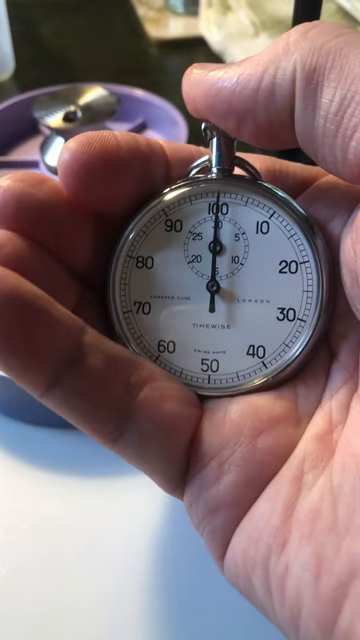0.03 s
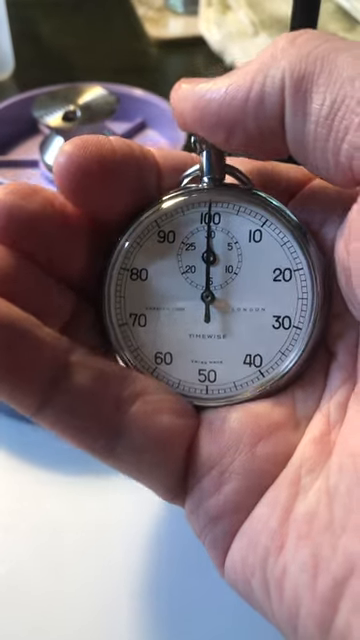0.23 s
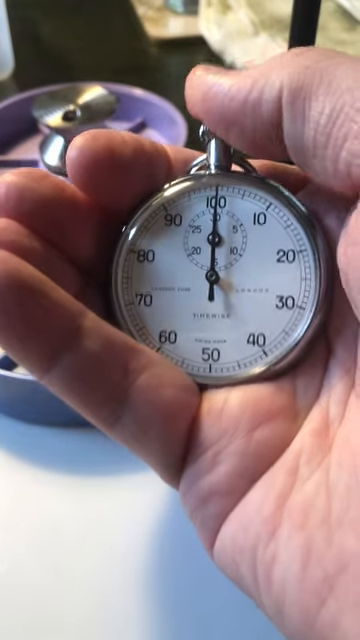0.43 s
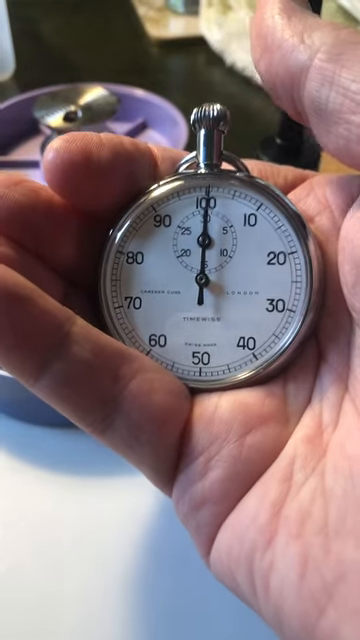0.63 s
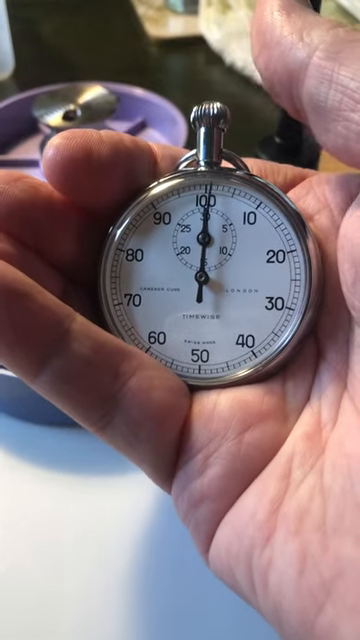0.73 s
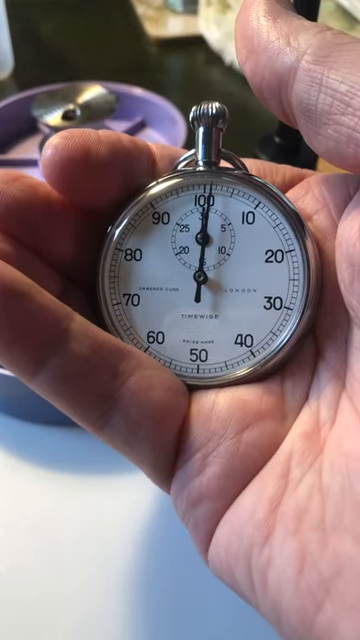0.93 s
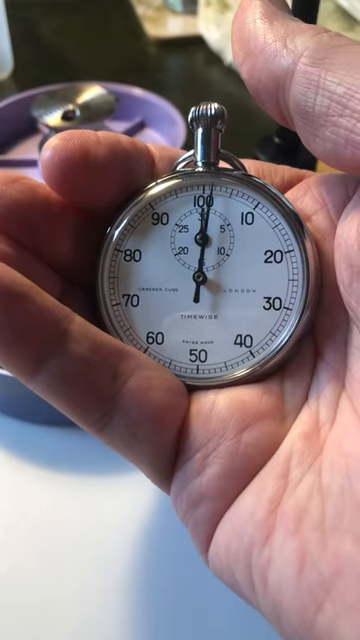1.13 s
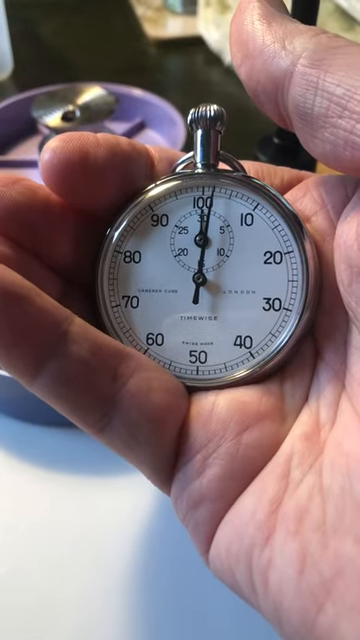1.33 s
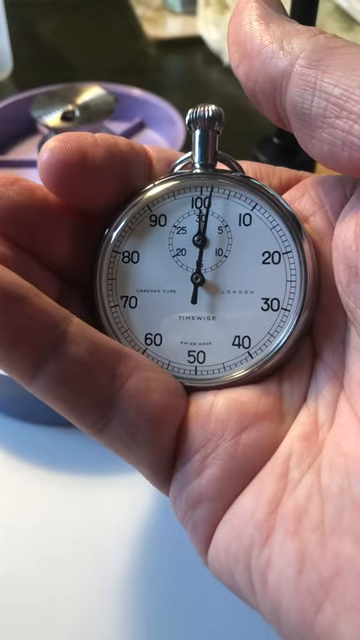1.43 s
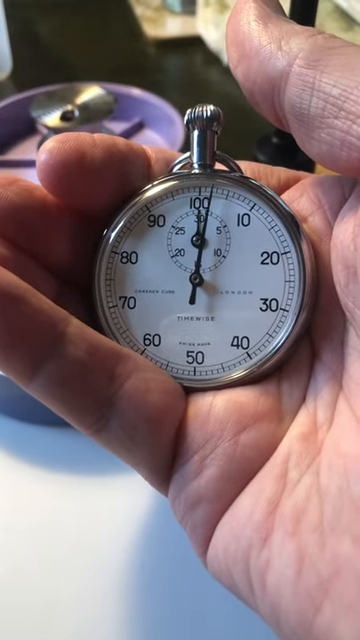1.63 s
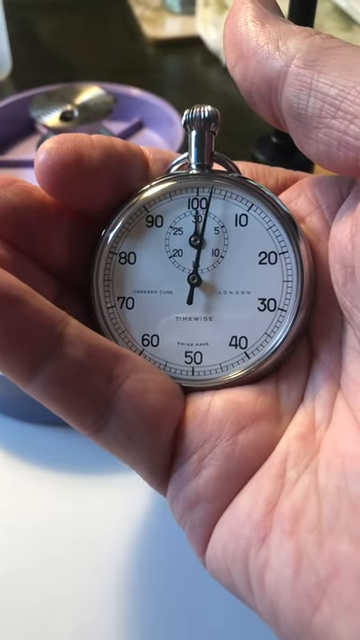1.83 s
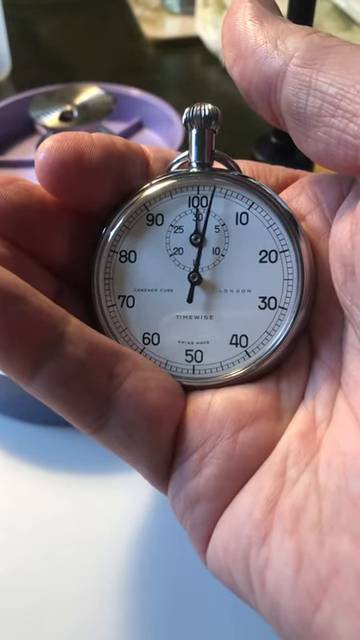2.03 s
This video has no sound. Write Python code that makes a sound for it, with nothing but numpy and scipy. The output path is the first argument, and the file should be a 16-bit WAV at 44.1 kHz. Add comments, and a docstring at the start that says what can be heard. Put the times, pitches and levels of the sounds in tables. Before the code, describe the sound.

A mechanical stopwatch held close to the microphone: a light click, a loud metallic snap, another crisp snap as the button springs back, then faint ticking five times a second in a small quiet room.

```python
"""Two sharp metallic snaps, then a tick five times a second, over a low rumble in a small, quiet room.
A hand-held mechanical stopwatch is started close to the microphone: the crown takes up its slack,
snaps down and springs back, and each blow excites the resonances of the steel case and the room.
The escapement ticks by runs of short noise bursts through its own resonances; fingers tap and rub
the case as bursts of band noise; the room is shaped noise, excited modes and a wavering low hum."""
import sys
import numpy as np
from scipy import signal
from scipy.fft import rfft, irfft
from scipy.io import wavfile

SR = 44100
rng = np.random.default_rng(int(sys.argv[2]) if len(sys.argv) > 2 else 0)


def to_wav(sig):
    """Store sig (one row per channel, or 1-D mono) as 16-bit WAV at the path in sys.argv[1].

    Samples outside -1..1 are clipped; the rate is SR.
    """
    pcm = np.clip(np.atleast_2d(sig), -1, 1) * 32767
    pcm = np.round(pcm).astype(np.int16)
    wavfile.write(sys.argv[1], SR, pcm.T)  # frames by channels


N = 92610
T = np.arange(N) / SR  # time, s
HZ = np.maximum(np.fft.rfftfreq(N, 1 / SR), 1)  # frequency of each spectral bin
DIRECT, TO_ROOM = 2, -1  # level columns of a table of resonances


def undb(db):
    """Level law: decibels to an amplitude ratio."""
    return 10 ** (np.asarray(db) / 20)


def fade(t60):
    """Exponential damping: the amplitude falls by 60 dB in t60 seconds."""
    return np.exp(-np.log(1000) * T / max(t60, 1e-4))


def delay(x, s):
    """Time shift: the sound starts s seconds later."""
    silence = np.zeros(max(int(round(s * SR)), 0))
    return np.concatenate([silence, x])[:N]


def hump(hz, half_width):
    """Resonance curve: unit gain at the centre, with steep sides."""
    return (1 + ((HZ - hz) / half_width) ** 2 / 2) ** -1.5


def response(modes, column):
    """Modal superposition: the powers of all resonances add, at the levels in one column."""
    powers = [(hump(mode[0], mode[1]) * undb(mode[column])) ** 2 for mode in modes]
    return np.sqrt(sum(powers))


def struck(gain):
    """Minimum phase: folding the cepstrum gives the causal impulse response with this gain."""
    cepstrum = irfft(np.log(gain + 1e-5), N)
    cepstrum[1:N // 2] *= 2
    cepstrum[N // 2 + 1:] = 0
    return irfft(np.exp(rfft(cepstrum)), N)


def noise(gain):
    """Linear filtering: white noise takes on this gain."""
    return irfft(rfft(rng.standard_normal(N)) * gain, N)


def unit(x):
    """Normalisation to a standard deviation of 1."""
    return x / np.std(x)


def coloured(points):
    """Spectral shaping: unit noise with levels interpolated over log frequency."""
    hz, db = np.array(points).T
    return unit(noise(undb(np.interp(np.log(HZ), np.log(hz), db))))


def level_curve(rows):
    """Slow amplitude modulation: levels in dB interpolated over time, as a gain."""
    return undb(np.interp(T, *np.array(rows).T))


def burst(t60):
    """Random excitation: exponentially dying chatter of unit energy."""
    x = rng.standard_normal(N) * fade(t60)
    return x / np.linalg.norm(x)


def room(gain):
    """Reverberation as decaying noise: weak early scatter, then the walls; the treble dies first."""
    wall_delay_s, early_db = .0118, -2
    t60_s, damping = 0.37, .27  # t60 at 3 kHz, falling as this power of frequency
    arrival = np.where(T < wall_delay_s, undb(early_db), 1)
    octaves = np.log2(np.clip(HZ / 3000, 1 / 2, 4))
    out = 0
    for k in range(-1, 3):
        env = fade(t60_s * 2 ** (-k * damping)) * arrival
        band = np.sqrt(np.maximum(1 - abs(octaves - k), 0))  # the band powers sum to one
        out = out + noise(gain * band) * env / np.linalg.norm(env)
    return out


def blows(rows, modes, rattle_db, rattle_t60, room_db, snap_db):
    """Impact excitation: a sharp snap and a brief rattle of the works ring the resonances and room."""
    crowd_hz, crowd_width_hz = 7000, 3500  # crowd of weak case modes
    crowd_db = -13  # against the strongest resonance in the room
    direct = response(modes, DIRECT)
    sent = response(modes, TO_ROOM)
    sent = np.hypot(sent, sent.max() * undb(crowd_db) * hump(crowd_hz, crowd_width_hz))
    out = 0
    for s, db, tilt in rows:
        # the tilt pivots at 7 kHz and is level below 1 kHz
        colour = undb(db + tilt * np.log2(np.maximum(HZ, 1000) / 7000))
        ring = struck(direct * colour)
        rattle = signal.fftconvolve(ring, burst(rattle_t60))[:N]
        echo = room(sent * colour)
        blow = undb(snap_db) * ring + undb(rattle_db) * rattle + undb(room_db) * echo
        out = out + delay(blow, s)
    return out


def background(waver_db=3.5, waver_hz=4):
    """Stationary noise and excited room modes, with a swelling distant rumble and a modulated hum."""
    # spectrum of the steady room noise: frequency_hz, relative_level_db
    floor_spectrum = [(20, -41.5), (35, -22), (50, -14.5), (75, -13.5), (120, -7), (180, -4.5), (260, -9),
                      (450, -14.5), (900, -19.5), (1800, -29.5), (3500, -34), (10000, -36), (13000, -41),
                      (16000, -45.5)]
    # spectrum of the distant rumble: frequency_hz, relative_level_db
    swell_spectrum = [(60, -31), (150, -5.5), (250, 2), (450, -1.5), (700, -9.5), (1200, -15), (2000, -30),
                      (4000, -48)]
    # rise and fall of the distant rumble: time_s, level_db
    swell_levels = [(0, -77.5), (.85, -72), (1.15, -73.5), (1.45, -60.5), (1.7, -71.5), (2.1, -88)]
    # low room resonances: centre_hz, half_width_hz, relative_level_db
    room_modes = [(171, 7.7, 0), (205.6, 26, -3), (303, 9.9, -9), (380, 18, -12.5)]
    # excitation of those resonances: time_s, level_db
    boom_levels = [(0, -63.5), (.8, -67), (1.2, -59.5), (1.6, -59), (2.1, -68)]
    # course of the low hum: time_s, level_db
    hum_levels = [(0, -74), (.4, -68.5), (.92, -66), (1.02, -73), (1.5, -70.5), (2.1, -80)]
    floor_db, hum_hz = -65.5, 49.4

    steady = coloured(floor_spectrum) * undb(floor_db)
    boom = unit(noise(response(room_modes, 2))) * level_curve(boom_levels)
    rumble = coloured(swell_spectrum) * level_curve(swell_levels)
    waver = undb(waver_db * unit(noise(hump(0, waver_hz))))
    hum = unit(np.sin(2 * np.pi * hum_hz * T) * waver) * level_curve(hum_levels)
    return steady + boom + rumble + hum


def crown_slack():
    """Light impact: the crown takes up its slack and rings the stem in its sleeve."""
    # blow: start_s, level_db, brightness_db_per_octave
    slack = [(.0407, 0.5, -2)]
    # stem resonances: centre_hz, half_width_hz, direct_db, to_room_db
    stem_modes = [(1803, 300, -24, -39.5), (2850, 490, -15.5, -32.5), (4750, 800, -20.5, -35),
                  (7150, 195, -14.5, -38), (8150, 670, -23.5, -36.5), (11050, 570, -13, -38),
                  (13450, 400, -14, -45), (14850, 580, -8.5, -40)]
    return blows(slack, stem_modes, rattle_db=-5.5, rattle_t60=0.0088, room_db=-1, snap_db=0.5)


def crown_press():
    """Impact and free vibration: the crown snaps down; weakly damped tones of case and spring ring on."""
    # blows: start_s, level_db, brightness_db_per_octave
    presses = [(0.2182, -40, 0), (.2300, -44.5, 1.6), (0.2412, 1, 0.22)]
    # case resonances, crown down: centre_hz, half_width_hz, direct_db, to_room_db
    press_modes = [(1072, 380, -4.5, -21.5), (1504, 150, 0, -20), (2714, 150, 13.5, -2.5),
                   (3200, 270, 16, -6), (3900, 370, 3, -14), (4890, 130, -9.5, -4.5),
                   (5620, 310, 10.5, -4.5), (6300, 500, 9.5, -7.5), (7160, 320, 12.5, -11.5),
                   (7950, 380, 13.5, -8.5), (9070, 320, 11, -22), (11400, 600, 2, -18.5),
                   (13450, 600, -1.5, -30), (15580, 450, -0.5, -28.5)]
    # long rings of case and spring: frequency_hz, level_db, t60_s
    rings = [(2685, -41, .2), (2756, -48, .24), (3088, -53, .3), (5632, -56, .35), (6041, -58, .4)]
    snap = blows(presses, press_modes, rattle_db=-7, rattle_t60=.012, room_db=2, snap_db=0)
    ring = sum(undb(db) * np.sin(2 * np.pi * hz * T) * fade(t60) for hz, db, t60 in rings)
    return snap + delay(ring, presses[-1][0])


def crown_release():
    """Impact and friction: the crown springs back, its stem scraping as noise through the case."""
    # blows: start_s, level_db, brightness_db_per_octave
    releases = [(.4738, -46.5, 3), (.4948, -12.5, -2.5), (.4962, 2.5, 0.5)]
    # case resonances, crown springing back: centre_hz, half_width_hz, direct_db, to_room_db
    release_modes = [(1412, 230, -14, -26.5), (2150, 120, -8.5, -26), (2707, 81, 3.5, -20.5),
                     (3360, 150, 14, -13.5), (4346, 300, 5.5, -18.5), (4800, 220, 1, -12),
                     (5300, 120, 5.5, -15.5), (6960, 180, 12, -23), (8385, 550, 14, -19.5),
                     (9500, 475, 10, -25), (10530, 280, 3.5, -24.5), (11470, 410, 6.5, -23),
                     (13630, 897, -12, -36), (15700, 260, -14, -47)]
    scrape_s, scrape_length_s = .485, .011
    scrape_db = -45.5  # reached at the end of its rise
    snap = blows(releases, release_modes, rattle_db=-12, rattle_t60=0.0079, room_db=2.5, snap_db=-0.5)
    rise = np.sqrt(T / scrape_length_s) * (T < scrape_length_s)
    scrape = unit(noise(response(release_modes, DIRECT))) * rise * undb(scrape_db)
    return snap + delay(scrape, scrape_s)


def hand(tap_t60=0.015):
    """Contact and friction: tiny taps, soft grainy rubs and one dull damped bump as the grip shifts."""
    # soft rubs of skin: start_s, level_db, centre_hz, half_width_hz
    rubs = [(0.159, -68.5, 3150, 1040), (0.454, -63.5, 3170, 1400), (0.603, -67, 2900, 708),
            (.65, -70.5, 1880, 1420), (0.966, -70, 3140, 1117), (1.405, -66, 3155, 849.5),
            (1.777, -69.5, 2860, 1300)]
    # small creaks and taps of the watch: start_s, level_db, centre_hz, half_width_hz
    taps = [(.365, -30.5, 10300, 2000), (.562, -31, 10330, 1780), (.655, -26, 6720, 300),
            (.742, -32, 3200, 1626), (.742, -37.5, 8410, 2984), (.777, -29.5, 2970, 1800),
            (.781, -33.5, 2150, 3450), (.857, -36.5, 4903, 1200), (1.671, -34.5, 2607, 2390),
            (1.912, -39.5, 2970, 2495)]
    rub_attack_s, rub_t60_s = .014, .38
    grain_db, grain_hz = 2.5, 120.2  # rms depth and bandwidth of the roughness
    # the case settles against the palm
    bump_s, bump_hz, bump_t60_s, bump_db = .787, 113, 0.13, -50

    tapping = 0
    for s, db, hz, width in taps:
        tap = signal.fftconvolve(burst(tap_t60), struck(hump(hz, width)))[:N]
        tapping = tapping + delay(tap, s) * undb(db)
    stroke = np.minimum(T / rub_attack_s, 1) * fade(rub_t60_s)
    rubbing = 0
    for s, db, hz, width in rubs:
        rubbing = rubbing + delay(unit(noise(hump(hz, width))) * stroke, s) * undb(db)
    grain = undb(grain_db * unit(noise(hump(0, grain_hz))))
    bump = undb(bump_db) * np.sin(2 * np.pi * bump_hz * T) * fade(bump_t60_s)
    return tapping + rubbing * grain + delay(bump, bump_s)


def escapement(room_db=-2, chatter_t60=.008):
    """Source and resonator: every beat is a quick run of contacts heard through the case and room."""
    # beats: drop_s, level_db
    beats = [(0.763, 2), (0.9609, -1), (1.1613, 0), (1.36, -1.5), (1.5609, -2), (1.7601, 0.5),
             (1.9602, -0.5)]
    # unlocking, impulse, drop and rebound within a beat: time_from_drop_s, level_db
    contacts = [(-.020, -20), (-.013, -15.5), (0, -9), (.0013, -6.5)]
    # escapement resonances: centre_hz, half_width_hz, direct_db, to_room_db
    tick_modes = [(3560, 37, -16, -27), (4930, 2200, -31, -37), (7030, 166, -21, -41),
                  (9150, 530, -23, -38), (10460, 480, -23.5, -45), (12100, 1500, -29.5, -52),
                  (14700, 600, -49, -62)]
    drive = 0
    for s, beat_db in beats:
        for lag, contact_db in contacts:
            drive = drive + delay(burst(chatter_t60), s + lag) * undb(beat_db + contact_db)
    echo = room(response(tick_modes, TO_ROOM))
    body = struck(response(tick_modes, DIRECT)) + undb(room_db) * echo
    return signal.fftconvolve(drive, body)[:N]


def scene():
    """Linear superposition: the room, the watch and the hand add at one microphone."""
    crown = crown_slack() + crown_press() + crown_release()
    return (background() + crown + hand() + escapement())[None]


def record(dry):
    """Band limiting: the recorder's steep elliptic low-pass cuts the top above 16.2 kHz."""
    low_pass = signal.ellip(8, .2, 70, 16200, fs=SR, output="sos")
    return signal.sosfilt(low_pass, dry)


dry = scene()
out = record(dry)
to_wav(out)
```